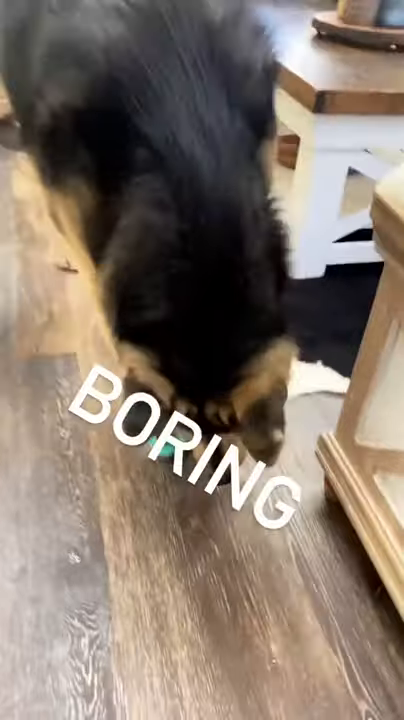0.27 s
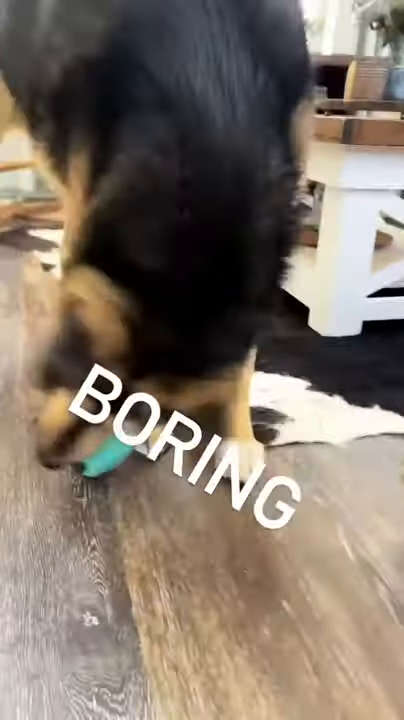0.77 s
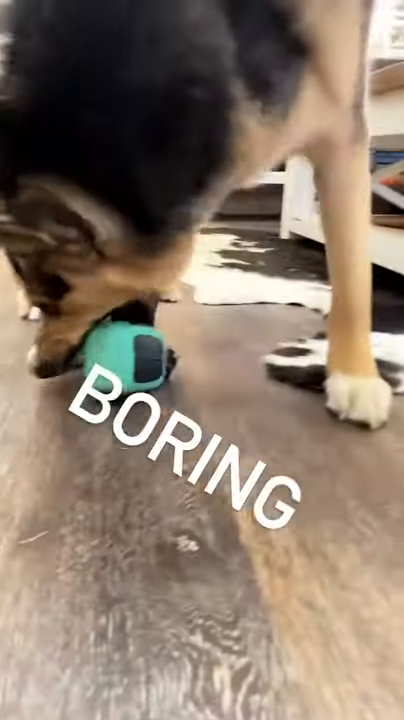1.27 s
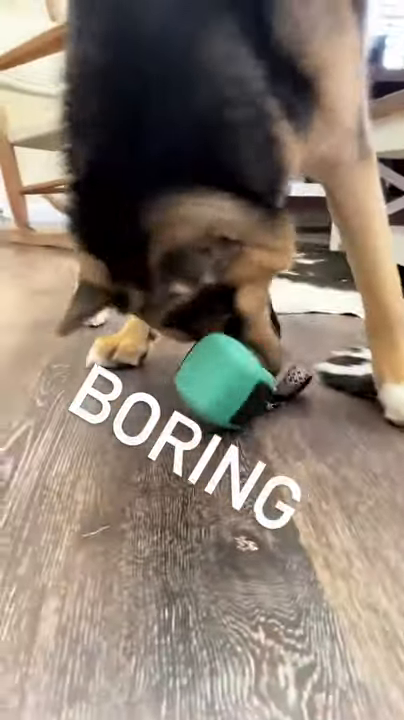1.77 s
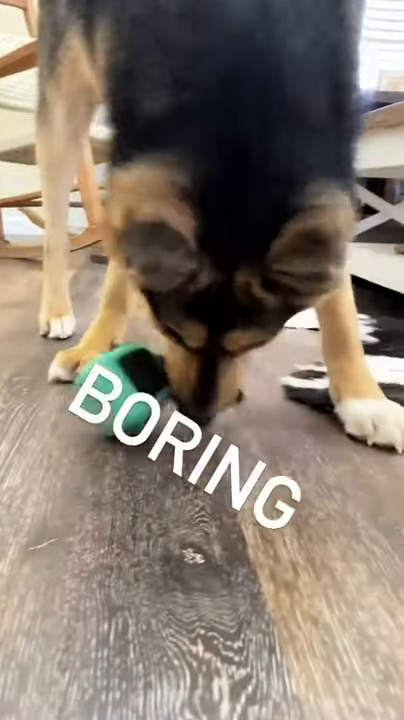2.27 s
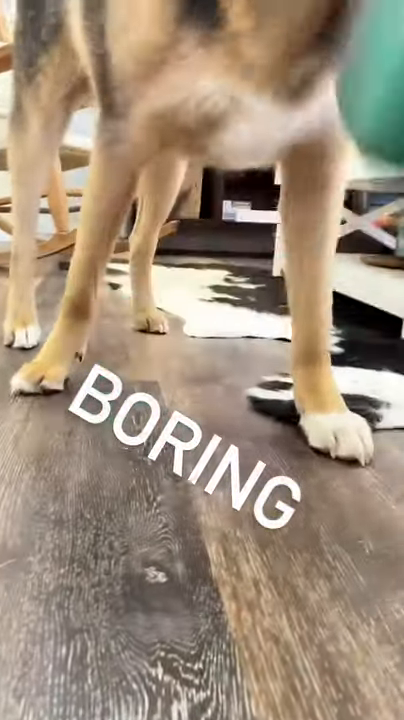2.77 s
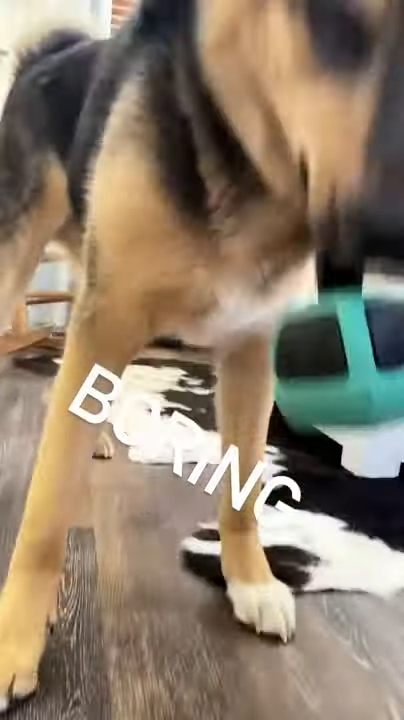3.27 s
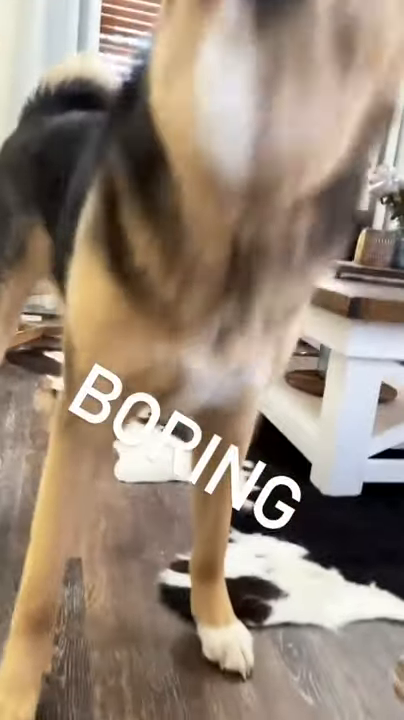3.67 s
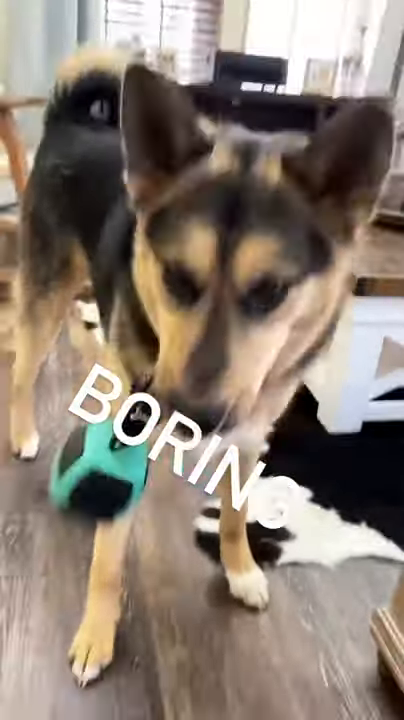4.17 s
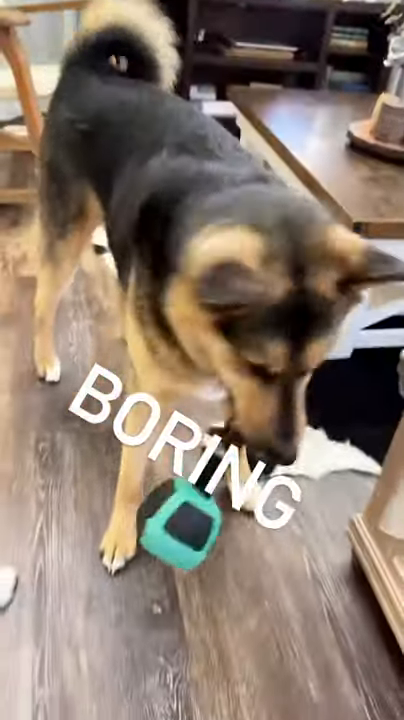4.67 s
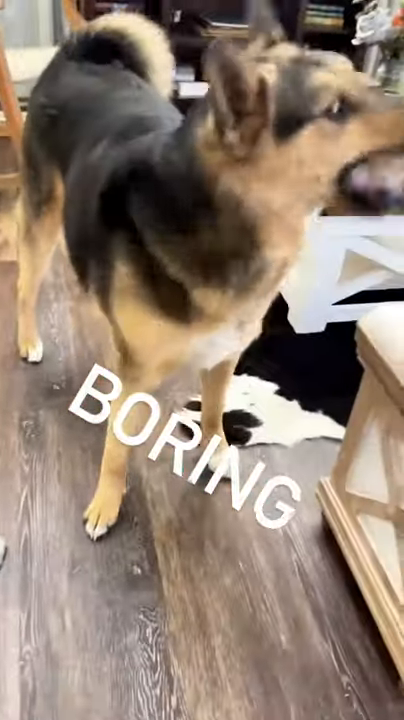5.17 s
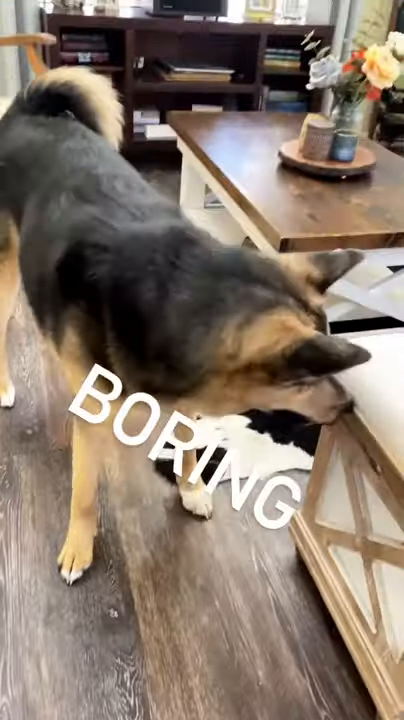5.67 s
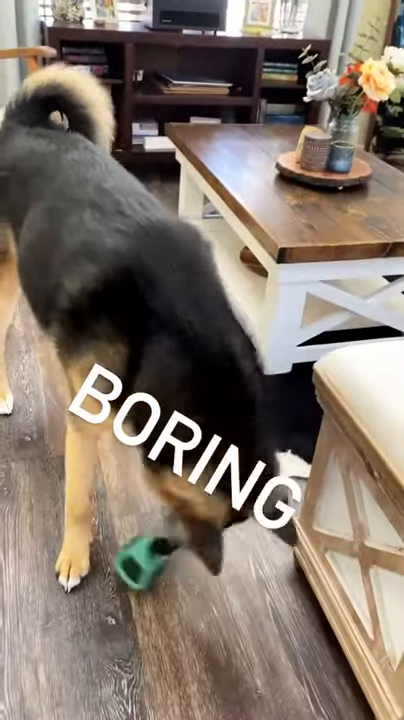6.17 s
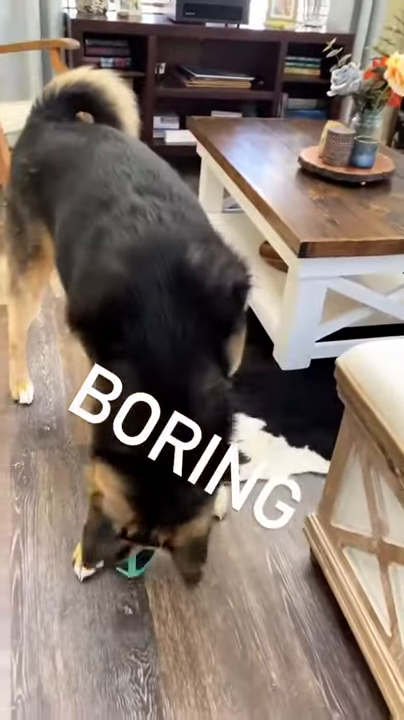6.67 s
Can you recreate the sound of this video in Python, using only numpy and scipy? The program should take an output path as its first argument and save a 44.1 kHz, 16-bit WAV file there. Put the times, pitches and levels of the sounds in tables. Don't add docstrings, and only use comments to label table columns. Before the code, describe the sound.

Close rustling, soft paw thuds and sharp claw scratches on boards, brief squeaks and sniffs, then a hollow rubber toy slaps down with a boomy clatter.

```python
import sys
import numpy as np
from scipy import signal
from scipy.fft import rfft, irfft, next_fast_len
from scipy.io import wavfile
from scipy.ndimage import uniform_filter1d

SR = 44100
rng = np.random.default_rng(int(sys.argv[2]) if len(sys.argv) > 2 else 0)


def wav_out(sig):
    wavfile.write(sys.argv[1], SR, np.round(np.clip(np.atleast_2d(sig).T, -1, 1) * 32767).astype(np.int16))


def gain_from_db(level_db):
    decades = np.asarray(level_db, float) / 20
    return 10 ** decades


N = 304849
OPPOSITE = np.array([[1], [-1]])


def unit(x):
    return x / np.sqrt(np.mean(x ** 2, axis=-1, keepdims=True))


def band(x, lo_hz, hi_hz, order=2):
    edges_hz = [lo_hz, min(hi_hz, .49 * SR)]
    return signal.sosfilt(signal.butter(order, edges_hz, "bandpass", fs=SR, output="sos"), x)


def lowpass(x, hz, order):
    return signal.sosfilt(signal.butter(order, hz, fs=SR, output="sos"), x)


def highpass(x, hz, order):
    return signal.sosfilt(signal.butter(order, hz, "highpass", fs=SR, output="sos"), x)


def shape(x, response):
    size = next_fast_len(N)
    return irfft(rfft(x, size) * response(np.fft.rfftfreq(size, 1 / SR)), size)[..., :N]


def walk(rate_hz):
    k = int(SR / rate_hz)
    steps = np.repeat(rng.standard_normal(N // k + 1), k)
    return unit(uniform_filter1d(uniform_filter1d(steps, k), k)[:N])


def add(track, s, sound):
    i = int(s * SR)
    track[i:i + len(sound)] += sound[:N - i]


def decay(t60, t):
    return 1000. ** (-t / t60)


def ring(hz, t60, t):
    return np.sin(2 * np.pi * hz * t) * decay(t60, t)


def swell(s, db, rise, fall):
    late = np.arange(0, N / SR, .001) - s
    roundness = 1.07
    return gain_from_db(2 * (db - 20 * np.where(late < 0, -late / rise, late / fall) ** roundness))


def smooth(power):
    return np.interp(np.arange(N), np.arange(len(power)) * SR / 1000, np.sqrt(power))


# [f/Hz, density/dB per Hz]
AIR_SPECTRUM = [(140, -10), (230, 11), (835, -10), (992, -9), (1720, -15.5), (4500, -33), (9270, -33.5),
                (14000, -47.5)]
AIR_DB = -63


def air():
    hz, db = np.transpose(AIR_SPECTRUM)
    colour = lambda f: gain_from_db(np.interp(np.log(f + 1), np.log(hz), db))
    hiss = unit(shape(rng.standard_normal((2, N)), colour))
    return gain_from_db(AIR_DB + 0.5 * walk(1.4)) * hiss


# [t/s, level/dB]
RUMBLE_LEVEL = [(0, -54), (1.3, -55), (3.5, -54), (4.5, -57), (6.91, -55.5)]
# [t/s, level/dB]
FLOOR_SHUDDERS = [
    (.33, -41.5),
    (.67, -41),
    (1.04, -39.5),
    (1.35, -43.5),
    (5.35, -41),
    (6.08, -58.5),
    (6.242, -39.5),
]
HUM_HZ, HUM_DB = 51, 3
SHUDDER_RISE_S, SHUDDER_FALL_S = 0.087, 0.072


def hum():
    phase = 2 * np.pi * np.cumsum(HUM_HZ * (1 + 0.0403 * walk(25))) / SR
    line = np.sqrt(2) * np.sin(phase) * gain_from_db(2.0 * walk(17))
    rumble = unit(band(rng.standard_normal(N), 50, 163.3))
    rumble = rumble + 0.37 * unit(band(rng.standard_normal(N), 155, 178))
    rumble = rumble + 1.1 * unit(band(rng.standard_normal(N), 24, 63))
    house = gain_from_db(np.interp(np.arange(N) / SR, *np.transpose(RUMBLE_LEVEL)))
    shudder = smooth(sum(swell(s, db, SHUDDER_RISE_S, SHUDDER_FALL_S) for s, db in FLOOR_SHUDDERS))
    return np.hypot(house * gain_from_db(HUM_DB), shudder) * line + house * rumble


# [f/Hz, t60/s, level/dB]
ROOM_OCTAVES = [(125, 0.71, -5), (262, 0.52, -11), (517, 0.88, -23.5), (1100, 0.21, -20.5),
                (2000, 0.52, -16.5), (4260, 0.38, -19.5), (6000, 0.4, -26)]


def room(x):
    t, tail = np.arange(int(.7 * SR)) / SR, 0
    for hz, t60, db in ROOM_OCTAVES:
        mid, side = rng.standard_normal((2, len(t)))
        both = mid + min(.1 + hz / 900, 1) * side * OPPOSITE
        fade = band(both, hz / np.sqrt(2), hz * np.sqrt(2)) * decay(t60, t) * (1 - np.exp(-t / 0.001))
        tail = tail + gain_from_db(db) * fade / np.sqrt(np.sum(fade ** 2) / 2) / np.sqrt(2)
    return signal.fftconvolve(x[None], tail, axes=1)[:, :N]


EARLY_DB, EARLY_T60_S = -14, .03


def early(x):
    t = np.arange(SR // 20) / SR
    scatter = rng.standard_normal(len(t)) * decay(EARLY_T60_S, t)
    echo = band(scatter, 2100, 3200) + 0.9 * band(scatter, 330, 1000)
    echo = echo / np.sqrt(np.sum(echo ** 2))
    return gain_from_db(EARLY_DB) * signal.fftconvolve(x, echo)[:N] * OPPOSITE


GUST_S, GUST_DB, GUST_HALF_S = 0.97, -44, 0.074


def gust():
    blow = np.exp(-((np.arange(N) / SR - GUST_S) / GUST_HALF_S) ** 4)
    puff = unit(band(rng.standard_normal(N), 45, 170))
    return gain_from_db(GUST_DB) * blow * puff * np.array([[1], [-.8]])


# [t/s, length/s, level/dB, resonance f/Hz, mid-breath rise/share]
BREATHS = [(3.52, 0.32, -67, 3740, 0.017), (4.1, 0.56, -87.5, 4300, 0.018), (4.663, 0.37, -77, 4160, 0.02),
           (5.006, 0.26, -79, 4200, 0.0081), (5.906, 0.41, -81, 3800, 0.12),
           (6.202, 0.37, -83.5, 4125, 0.021), (6.519, 0.211, -80.5, 3970, 0.038),
           (6.601, 0.29, -82.5, 4240, 0.1), (6.701, 0.25, -79, 4140, .01), (6.6, .62, -86.5, 4750, .02),
           (6.6, 0.27, -82.5, 4700, .02), (3.52, 0.338, -74, 2300, .02), (3.19, 0.142, -68.5, 2100, .05)]
# [t/s, level/dB, f/Hz, half length/s]
SNUFFS = [
    (5.553, -63, 1345, 0.01),
    (2.415, -61, 1995, 0.028),
    (4.268, -67, 1171, 0.094),
    (4.333, -55.5, 1575, 0.013),
    (5.251, -60.5, 870, 0.015),
    (6.615, -68, 1760, 0.036),
    (6.895, -63.5, 1770, 0.041),
]
# [t/s, level/dB, f/Hz, half length/s]
RUBBER_SQUEAKS = [(1.549, -69, 2380, 0.011), (3.201, -55, 1315, 0.017), (3.202, -64, 1940, .014),
                  (3.235, -53.5, 1930, 0.018), (3.248, -55.5, 2520, 0.018), (3.266, -60, 646, 0.014),
                  (3.295, -58.5, 2140, .02), (3.438, -55, 1385, .01), (4.2, -67, 1240, 0.018),
                  (4.284, -65, 2680, .015), (6.44, -74, 5200, 0.011)]
BREATH_EDGE_S, BREATH_WIDTH_HZ, RIDGE_WIDTH_HZ, RIDGE_DB = 0.058, 405, 140, -8


def nose():
    out = np.zeros(N)
    for s, length, db, hz, arch in BREATHS:
        u = np.arange(int(length * SR)) / SR
        edge = np.clip(np.minimum(u, length - u) / BREATH_EDGE_S, 0, 1)
        air_flow = rng.standard_normal((2, SR))
        wide = unit(lowpass(air_flow, BREATH_WIDTH_HZ, 2))[:, :len(u)]
        ridge = unit(lowpass(air_flow, RIDGE_WIDTH_HZ, 2))[:, :len(u)]
        flutter = wide + gain_from_db(RIDGE_DB) * ridge
        turn = 2 * np.pi * np.cumsum(hz * (1 + arch * np.sin(np.pi * u / length))) / SR
        whistle = flutter[0] * np.cos(turn) + flutter[1] * np.sin(turn)
        add(out, s, edge * gain_from_db(db + 7.5) * whistle)
    u = np.arange(SR // 2) / SR - .25
    for s, db, hz, length in SNUFFS + RUBBER_SQUEAKS:
        puff = unit(band(rng.standard_normal(len(u)), hz * .95, hz * 1.05))
        add(out, s + u[0], gain_from_db(db) * np.exp(-(u / length) ** 2) * puff)
    return out


# [t/s, peak level/dB, rise/s, fall/s, f/Hz]
HAIR_FIZZ = [(1.1, -58, .15, .1, 9400), (0.4, -68, .08, .2, 12000), (0.52, -71.5, .1, 0.13, 11000),
             (1.3, -70, .08, 0.084, 10000), (1.065, -54.5, .02, 0.087, 8400),
             (4.2, -71, 0.098, 0.088, 11600), (1.9, -69.5, 0.089, .1, 9800), (0.9, -60.5, 0.25, .1, 11000),
             (0.48, -62.5, .03, .12, 14000), (0.34, -83, 0.027, .1, 12000), (2.4, -69, 0.026, 0.12, 14000),
             (3.3, -71, 0.022, 0.16, 9800), (3.0, -61, .02, 0.21, 8700), (1.8, -77, .02, 0.13, 13000)]


def fizz():
    hiss = rng.standard_normal(N)
    return sum(smooth(swell(*row)) * unit(band(hiss, hz / 1.8, hz * 1.02)) for *row, hz in HAIR_FIZZ)


# [t/s, peak level/dB, board f/Hz]
PAW_STEPS = [(0.269, -43.5, 143.4), (0.527, -41, 94), (0.643, -42.5, 149), (0.84, -39, 83),
             (0.971, -30, 122.1), (1.132, -40, 89), (1.29, -45.5, 184), (1.335, -38.5, 98),
             (1.551, -51, 158), (1.754, -47, 157), (1.956, -46, 156.6), (2.217, -53, 151),
             (2.791, -49, 163.5), (2.979, -39.5, 167), (3.379, -41.5, 78), (3.64, -43, 78.1),
             (3.881, -48, 89), (4.133, -70, 165.5), (4.796, -55, 86), (5.178, -50, 153),
             (6.407, -50.5, 102.8), (6.592, -48, 98.7), (6.715, -54, 84.3)]
PAW_T60_S, PAW_DAMP = 0.081, 0.74


def paws():
    out, t = np.zeros(N), np.arange(SR // 3) / SR
    for s, db, hz in PAW_STEPS:
        t60 = PAW_T60_S * gain_from_db(-PAW_DAMP * (db + 47.5))
        modes = ring(hz, t60, t) + .5 * ring(hz * 1.526, 0.56 * t60, t)
        thud = modes * (1 - np.exp(-t / 0.058))
        add(out, s, gain_from_db(db - 9.0) * thud / abs(thud).max())
    return out


# [t/s, peak level/dB, rise/s, fall/s, brightness/dB per band]
TOY_DRAGS = [(0.0, -50.5, 0.088, 0.18, 0.5), (.339, -48.5, 0.042, 0.53, -10),
             (0.909, -40.5, 0.036, 0.077, -4), (1.056, -44.5, 0.014, 0.091, 13.5),
             (1.336, -53, 0.048, 0.051, -9), (1.626, -60.5, 0.062, 0.032, 3), (2.114, -45, 0.043, 0.18, 2),
             (2.193, -40.5, 0.087, 0.15, 0), (2.429, -54.5, 0.069, 0.15, -7.5),
             (2.765, -42.5, 0.035, 0.098, -2), (2.814, -43.5, 0.075, 0.05, 4), (2.97, -52, 0.12, 0.11, 1),
             (3.205, -50, 0.039, 0.17, 8), (3.289, -54, 0.3, 0.029, 9), (3.417, -60, 0.14, 0.11, 5),
             (4.156, -54, 0.03, 0.27, -14), (4.31, -52, 0.17, 0.14, -0.5), (5.329, -47, 0.092, 0.38, -3.5),
             (6.07, -60, 0.11, 0.13, 2.5), (6.176, -62.5, 0.11, 0.48, -1), (6.909, -62, 0.08, .1, 1.5)]
# [t/s, peak level/dB, rise/s, fall/s, brightness/dB per band]
STRAP_SWISHES = [(0.0, -60, .1, 1.2, 1.5), (.339, -46, 0.034, 0.25, 0), (.63, -59, 0.039, 2.6, -5),
                 (.863, -51.5, 0.64, 0.19, -5), (0.907, -44, 0.043, 0.18, -2),
                 (1.055, -38, 0.06, 0.09, 0.5), (1.127, -56, 0.11, 0.18, -8.5),
                 (1.336, -70, 0.14, 0.47, 11), (1.855, -66, 0.05, 0.074, 2),
                 (1.995, -75.5, 0.021, 0.14, -11), (2.115, -46.5, 0.025, 0.15, 8),
                 (2.195, -50.5, 0.14, 0.085, 4), (2.574, -56, 0.057, 0.079, 0),
                 (2.993, -52, 0.056, 0.16, -2), (3.1, -59.5, .2, 0.29, 4), (3.4, -55.5, 0.2, 0.53, -6.5),
                 (3.582, -52.5, 0.43, 0.23, -3.5), (3.76, -65.5, 0.64, 0.37, -9),
                 (4.046, -64, 0.63, 0.14, 1), (4.31, -59.5, 0.47, 0.41, 7), (4.6, -70.5, 0.34, 3, -4.5),
                 (5.133, -63, .2, 0.074, 9), (5.453, -60.5, 0.26, 0.14, 11.5), (6.149, -65, 0.22, 0.46, 4)]
# [t/s, peak level/dB, rise/s, fall/s]
FUR_BRUSHES = [(0.0, -58, .1, 0.17), (.339, -76, 0.019, 1), (.549, -60.5, 0.42, 0.014),
               (0.893, -39, 0.016, 0.058), (.96, -43, 0.059, 0.034), (1.522, -56, 0.26, 0.12),
               (2.029, -61, 0.078, 0.11), (2.574, -51.5, 0.048, 0.029), (2.993, -43, 0.011, 0.069),
               (3.522, -53.5, 0.026, 0.086), (3.926, -64.5, 0.13, 0.28), (4.58, -61, .11, 0.13),
               (5.133, -63, 0.14, 0.012), (5.453, -70, 0.12, 0.37)]
# [low f/Hz, high f/Hz]
RUB_EDGES = [(380, 1510), (1400, 4740), (3200, 7000), (6500, 10250)]
# [f/Hz, width/Hz, level/dB]
TOY_RESONANCES = [(421, 66, 9), (719, 92, 1.5), (1050, 290, -5.5), (1333, 100, -13), (2012, 260, -6.5),
                  (2423, 540, -3), (3660, 6900, 3.5)]
DRAG_DB, SWISH_DB, BRUSH_DB = [-1.5, -7, -21.5, -49.5], [-22.5, -4, -1, -43], [-27, -26.5, -17.5, 2.5]
STILL_DB = [-84.5, -81.5, -85, -100]
RUB_TOP_HZ, FLICKER_DB = 7270, 2.2


def rubbing():
    def toy_colour(f):
        return .2 + sum(gain_from_db(db) / (1 + (2 * (f - hz) / width) ** 2) for hz, width, db in TOY_RESONANCES)

    unevenness = gain_from_db(2.37 * np.minimum(rng.exponential(size=(4, N)), 7))
    slips = rng.standard_normal((4, N)) * unevenness
    slips[:2] = shape(slips[:2], toy_colour)
    slips[:3] = lowpass(slips[:3], RUB_TOP_HZ, 6)
    step = np.arange(len(RUB_EDGES))[:, None]
    tint = lambda db: gain_from_db(db)[:, None] ** 2
    drag = sum(swell(*row) * gain_from_db(2 * db * step) for *row, db in TOY_DRAGS)
    swish = sum(swell(*row) * gain_from_db(2 * db * (step - 2.5)) for *row, db in STRAP_SWISHES)
    brush = sum(swell(*row) for row in FUR_BRUSHES)
    power = tint(STILL_DB) + tint(BRUSH_DB) * brush + tint(DRAG_DB) * drag + tint(SWISH_DB) * swish
    out = np.zeros(N)
    for x, edges, p in zip(slips, RUB_EDGES, power):
        out += unit(band(x, *edges)) * smooth(p) * gain_from_db(-6.0 + FLICKER_DB * walk(32))
    return out


# [t/s, peak level/dB, ring f/Hz, bright share/dB]
TOOTH_KNOCKS = [(0.267, -38.5, 560, -14), (0.316, -25.5, 1200, -17), (0.642, -37.5, 560, -8),
                (1.291, -45.5, 570, -25), (1.616, -53.5, 584, -15), (1.995, -52, 820, 1),
                (2.177, -30, 873, -43), (2.199, -32, 1050, -42), (2.458, -40.5, 1780, -9),
                (2.56, -49.5, 533, 8), (2.977, -41.5, 1080, 14), (3.367, -36.5, 2080, -27),
                (3.384, -35.5, 600, -17), (3.412, -31, 933, -17), (0.256, -44.5, 686, -30),
                (4.08, -46, 1105, -35), (4.141, -41.5, 867, -46), (4.325, -58.5, 1540, -26.5),
                (5.141, -54, 966, -27), (5.231, -39.5, 815, -41.5)]
# [t/s, peak level/dB, ring f/Hz, bright share/dB, t60/s]
CLAW_SCRATCHES = [(0.418, -41, 5340, -25, 0.035), (1.088, -45, 3960, -25.5, 0.0073),
                  (2.233, -42.5, 3100, -30, 0.0099), (2.453, -59.5, 2980, 9, 0.0072),
                  (2.5647, -45.5, 3670, 0, 0.033), (2.624, -46.5, 4050, 2, 0.022),
                  (2.816, -30, 5930, -8, 0.022), (2.822, -37, 3600, -27, 0.0051),
                  (2.978, -25, 5630, -8, 0.046), (3.439, -44, 3280, -37, 0.024),
                  (4.033, -37, 6020, -16, 0.028), ]
# [t/s, peak level/dB, ring f/Hz, bright share/dB, t60/s]
CLAW_SKIDS = [(0.3408, -28.5, 2230, -1, 0.0055), (0.341, -28.5, 5860, -24, 0.016),
              (1.021, -25.5, 3080, -19, 0.02), (1.045, -17.5, 5800, -36, 0.029),
              (1.048, -20.5, 3760, -42, 0.05), (1.0511, -16.5, 5660, -39, 0.018),
              (1.056, -12, 6800, -28, 0.0088), (1.0592, -21.5, 3550, -29.5, 0.016),
              (1.0699, -29, 2600, -24, .015), (0.3165, -31.5, 2700, -8, 0.018),
              (.318, -38, 447, -50, 0.021), (.644, -45, 322, -43, 0.033), (6.181, -39.5, 600, -40.5, 0.019),
              (1.319, -52.5, 2450, -24, 0.078), (3.631, -43.5, 340, -50, 0.051),
              (5.281, -33, 4130, -29.5, 0.018), (5.2814, -26.5, 1445, -32.5, 0.0052),
              (5.2877, -27, 262, -45, 0.038), (5.586, -31.5, 1300, -31, 0.018),
              (6.06, -31, 534, -40, 0.011), (6.059, -41, 1550, -24, 0.011),
              (6.139, -38.5, 517, -26.5, 0.018), (6.14, -49.5, 1580, -3.5, 0.021),
              (6.181, -44, 1440, -24, 0.0074)]
# [t/s, peak level/dB, ring f/Hz, bright
# share/dB, t60/s]
MORE_TAPS = [(.8822, -51, 3880, -20, 0.043), (0.89, -37, 3300, -20, 0.023), (1.317, -50, 1574, -30, 0.027),
             (2.023, -49, 1900, -22, .015), (2.111, -50, 2500, -31, .015), (2.124, -41, 1600, -30, 0.016),
             (2.135, -43, 1830, -29, 0.013), (2.177, -47, 2900, -28, 0.011), (2.67, -57, 6470, 8, 0.0083),
             (2.738, -44, 1290, -25, .02), (1.62, -57.5, 2000, -18, 0.024), (1.047, -33, 6500, -8, 0.0094),
             (2.979, -55, 6500, 6, .012), (.3415, -43, 4030, 2, .006), (6.062, -44, 900, -29, 0.015),
             (6.181, -54, 900, -34, 0.019), (6.28, -60.5, 5500, -10, 0.023),
             (4.99, -61.5, 2700, -18, 0.019), (2.769, -47, 1340, -32, 0.029), (3.398, -47, 360, -43, .04),
             (3.411, -38.5, 1390, -30, 0.0083), (3.42, -51, 800, -30, 0.011),
             (3.423, -44, 1110, -35, 0.0078), (3.503, -47.5, 840, -35, 0.019),
             (4.035, -72, 2970, -21, 0.011), (4.081, -65, 2000, -29, 0.009),
             (4.141, -59.5, 1620, -30.5, 0.0061), (5.452, -42, 378, -45, 0.038),
             (5.465, -43.5, 223, -51, 0.056)]
KNOCK_T60_S = 0.02


def ticks():
    out, t = np.zeros(N), np.arange(4000) / SR
    knocks = [(*row, KNOCK_T60_S) for row in TOOTH_KNOCKS]
    for s, db, hz, bright_db, t60 in knocks + CLAW_SCRATCHES + CLAW_SKIDS + MORE_TAPS:
        scrape = rng.standard_normal((2, len(t))) * decay(t60, t) * (1 - np.exp(-t / 0.0006))
        body = band(scrape[0], hz / 1.249, hz * 1.194)
        body = body + 0.38 * band(scrape[0], hz * 0.28, hz * 1.6, order=3)
        body = lowpass(body, 6950, 12)
        crack = band(scrape[1], 5100, 9600) + band(scrape[1], 12500, 14000)
        add(out, s, gain_from_db(db) * (body / abs(body).max() + gain_from_db(bright_db) * crack / abs(crack).max()))
    return out


# [t/s, level/dB, f/Hz, t60/s]
BOARD_SWINGS = [(5.285, -18.5, 232.5, 0.085), (5.299, -26, 110.5, 0.23), (5.335, -30, 95, 0.28),
                (5.589, -25, 252, 0.06), (5.593, -28, 114.7, 0.31), (5.595, -35.5, 81.3, 0.39),
                (6.062, -35, 224.3, 0.21), (6.065, -26.5, 74.1, 0.27), (6.066, -34, 161.5, 0.23),
                (6.138, -37, 62.3, 0.65), (6.148, -36, 125, 0.29)]
# [ratio to board f, level/dB]
BOARD_MODES = [(1, 0), (1.13, -9), (1.5, -10)]


def boards():
    out, t = np.zeros(N), np.arange(SR // 2) / SR
    for s, db, hz, t60 in BOARD_SWINGS:
        swing = sum(gain_from_db(g) * ring(hz * ratio, t60, t) for ratio, g in BOARD_MODES)
        add(out, s, gain_from_db(db + 4.0) * swing * (1 - np.exp(-(t * hz / 1.7) ** 2)))
    return out


# [t/s, level/dB, contact/s]
RUBBER_SLAPS = [
    (5.2903, -18.5, .0008),
    (5.594, -26, .0008),
]


def slaps():
    t = np.arange(N) / SR
    return -sum(gain_from_db(db) * np.exp(-((t - s) / contact) ** 2) for s, db, contact in RUBBER_SLAPS)


# [t/s, peak level/dB, tilt/dB per octave]
TOY_DROPS = [
    (5.281, -28.5, 1.5),
    (5.2878, -36.5, -12),
    (5.585, -31.5, 0),
    (6.063, -44, -13.5),
    (6.144, -41.5, -15),
]
# [f/Hz, level/dB, t60/s]
WOOD_MODES = [(389, 5.5, 0.065), (324, -2, 0.083), (531, 0.5, 0.098), (617, 2.5, 0.14), (770, -5.5, 0.1),
              (1147, -5, 0.075)]
# [f/Hz, level/dB, t60/s]
PANEL_CLATTER = [(286, -11.5, 0.22), (600, -8.5, 0.35), (1200, -19, 0.085), (2600, -10.5, 0.048),
                 (4300, -31, 0.039), (1250, -27, 0.26), (2450, -28, .25)]


def drops():
    out, t = np.zeros(N), np.arange(SR // 2) / SR
    for s, db, tilt_db in TOY_DROPS:
        wood, clatter = np.zeros(len(t)), np.zeros(len(t))
        for f, g, t60 in WOOD_MODES:
            level_luck, pitch_luck = rng.standard_normal(2)
            level_db = g + 1.9 * level_luck + tilt_db * np.log2(f / 300)
            wood += gain_from_db(level_db) * ring(f * (1 + 0.0081 * pitch_luck), t60, t)
        for f, g, t60 in PANEL_CLATTER:
            dense = unit(band(rng.standard_normal(len(t)), f / np.sqrt(2), f * np.sqrt(2)))
            clatter += gain_from_db(g + tilt_db * np.log2(f / 300)) * dense * decay(t60, t)
        add(out, s, gain_from_db(db) * (0.53 * wood + clatter) * (1 - np.exp(-t / 0.00046)))
    return out


# [f/Hz, left lead/rad]
PORT_LEAD = [(0, 0), (1400, .15), (2500, .9), (4000, 1.6), (6000, 2.1), (8000, 2.6), (10500, 2.5),
             (12000, 2.1)]
SIDE_NOTCH_HZ = 1800


def scene():
    dog = ticks() + paws() + rubbing() + nose() + drops() + fizz()
    lead = lambda f: np.exp(.5j * np.interp(f, *np.transpose(PORT_LEAD)) * OPPOSITE)
    near = shape(dog + boards() + slaps() + hum(), lead)
    left, right = near + room(dog) + air() + early(dog)
    side = highpass(left - right, 520, 1)
    side = side - 0.56 * band(side, SIDE_NOTCH_HZ / 1.25, SIDE_NOTCH_HZ * 1.18, order=1)
    return (left + right + side * OPPOSITE) / 2 + gust()


BLINK_SHARE, BLINK_DB, BLINK_BELOW_DB = .17, -24, -91
STREAK_DB, TOP_SHARE, TOP_BELOW_DB = 2.6, .42, -88


def blink(x):
    f, _, z = signal.stft(x, SR, nperseg=1024)
    f = f[:, None]
    bins, frames = z.shape[1:]

    def patches(draw, tall, wide):
        coarse = draw((bins // tall + 1, frames // wide + 1))
        return np.kron(coarse, np.ones((tall, wide)))[:bins, :frames]

    power = uniform_filter1d(np.mean(abs(z) ** 2, 0), size=9, axis=0)
    power = uniform_filter1d(power, size=5, axis=1)
    off = (patches(rng.random, 4, 5) < BLINK_SHARE) & (power < gain_from_db(2 * BLINK_BELOW_DB)) & (f > 700)
    top_draw = patches(rng.random, 12, 4) + patches(rng.random, 90, 5)
    bare = (top_draw < 2 * TOP_SHARE) & (power < gain_from_db(2 * TOP_BELOW_DB)) & (f > 7200)
    streak = uniform_filter1d(patches(rng.standard_normal, 5, 5), size=3, axis=1)
    streak = streak * (f > 900) * (power < gain_from_db(-140))
    gain = np.where(off | bare, gain_from_db(BLINK_DB), gain_from_db(STREAK_DB * streak))
    return signal.istft(z * gain, SR, nperseg=1024)[1][:, :N]


def roll_off(x):
    return signal.sosfilt(signal.butter(12, 14480, fs=SR, output="sos"), x)


# [t/s, depth/dB, half length/s]
GATE_DIPS = [
    (1.721, -11, 0.092),
    (2.74, -8.5, 0.032),
    (2.7, -9.5, .03),
    (2.36, -3.5, .03),
    (5.875, -5, 0.064),
    (1.946, -6.5, 0.077),
    (1.5, -7, 0.072),
    (4.58, -1.5, .06),
]
# [t/s, depth/dB, half length/s]
TREBLE_DIPS = [(1.036, -24, 0.0084), (1.24, -12, 0.028), (1.913, -12, 0.032), (2.178, -3, 0.051),
               (2.355, -11, .03), (2.772, -15, 0.029), (2.836, -19, 0.01), (3.36, -8, 0.023),
               (3.475, -2, 0.02), (3.677, -9, 0.023), (3.774, -8, .02), (4.08, -12, .025), (4.17, -12, .03),
               (4.4, -9, .05), (0.128, 0, 0.03), (0.33, -15, 0.0097), (0.363, -10, 0.017)]
TOP_HZ = 13150


def record(dry):
    x = highpass(dry, 36, 4)
    t = np.arange(0, N / SR, .001)
    dip_db = sum(db * np.exp(-((t - s) / half) ** 2) for s, db, half in GATE_DIPS)
    x = x + (smooth(gain_from_db(2 * dip_db)) - 1) * band(x, 410, 9000, order=1)
    thin_db = sum(db * np.exp(-((t - s) / half) ** 4) for s, db, half in TREBLE_DIPS)
    top = signal.sosfiltfilt(signal.butter(4, 7400, "highpass", fs=SR, output="sos"), x)
    x = x + (smooth(gain_from_db(2 * thin_db)) - 1) * top
    top_cut = signal.sosfilt(signal.ellip(8, .3, 60, TOP_HZ, fs=SR, output="sos"), x)
    mix = blink(top_cut)
    return roll_off(mix)


dry = scene()
out = record(dry)
wav_out(out)
```